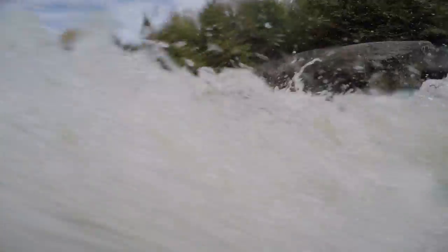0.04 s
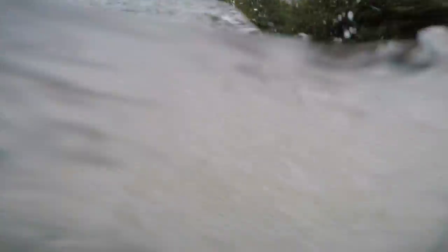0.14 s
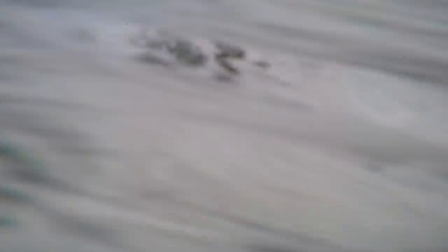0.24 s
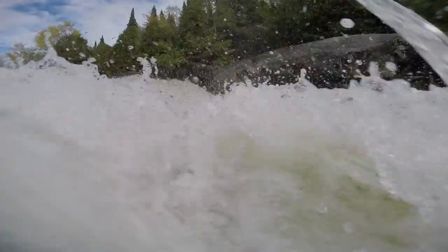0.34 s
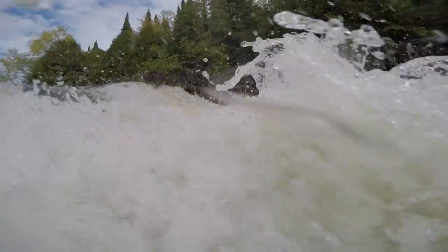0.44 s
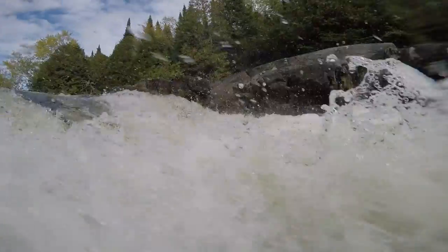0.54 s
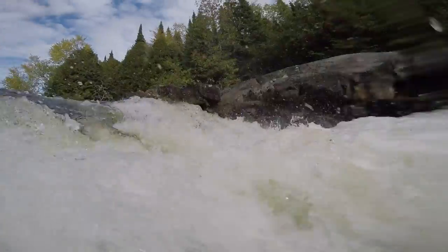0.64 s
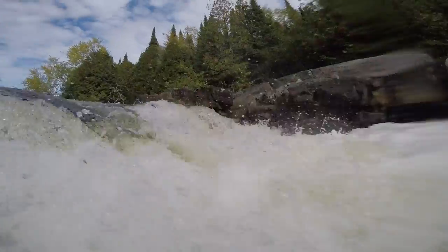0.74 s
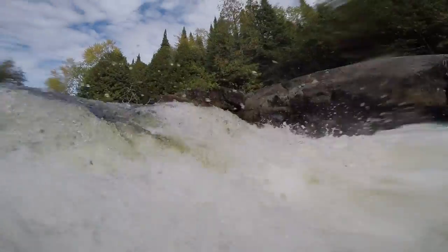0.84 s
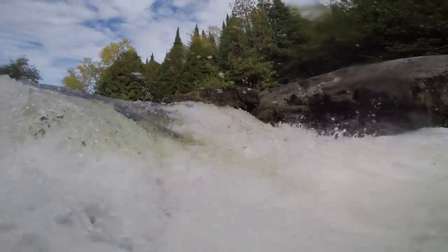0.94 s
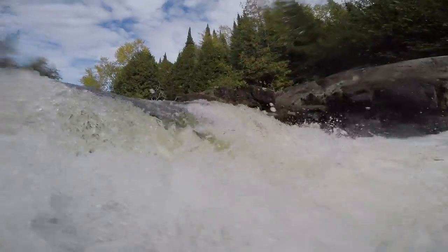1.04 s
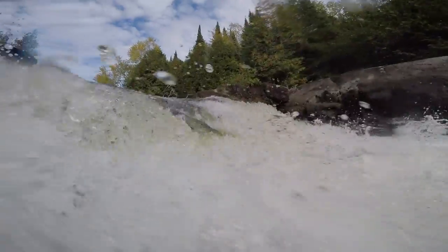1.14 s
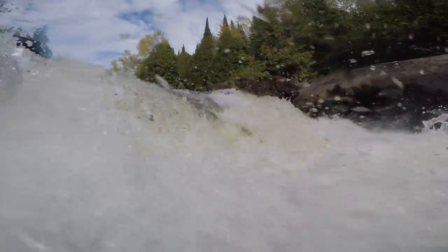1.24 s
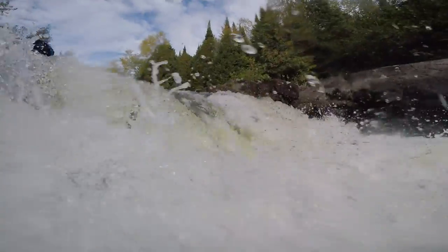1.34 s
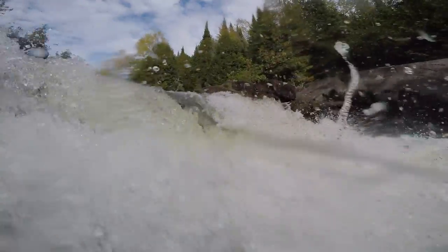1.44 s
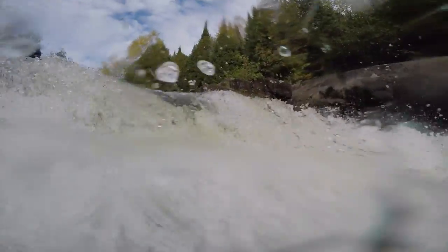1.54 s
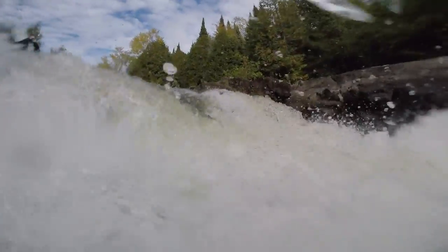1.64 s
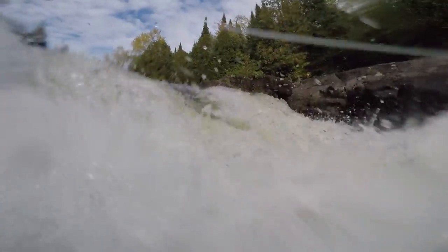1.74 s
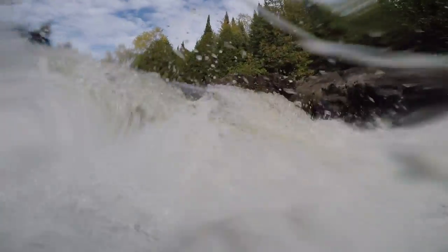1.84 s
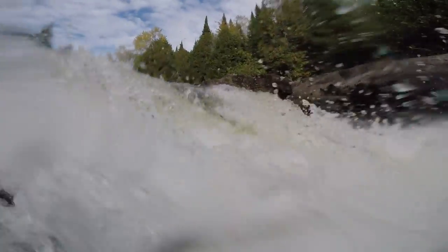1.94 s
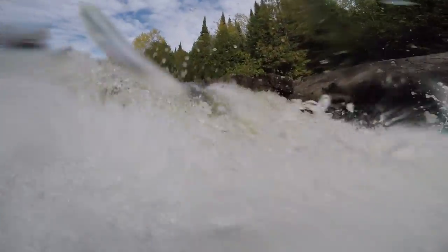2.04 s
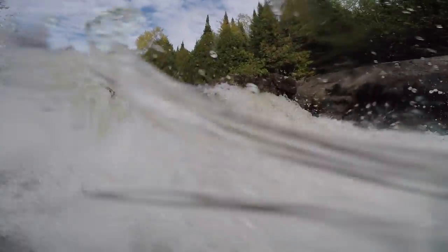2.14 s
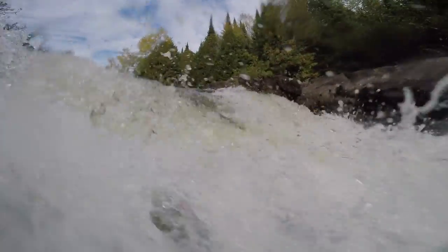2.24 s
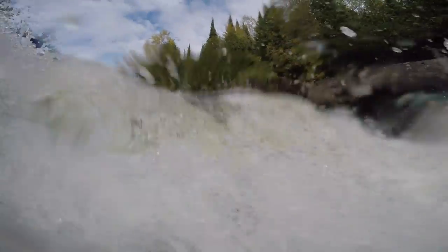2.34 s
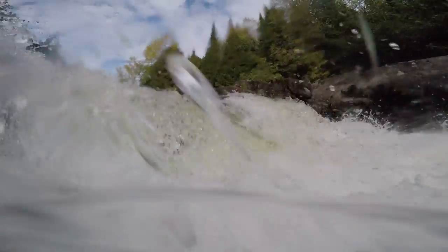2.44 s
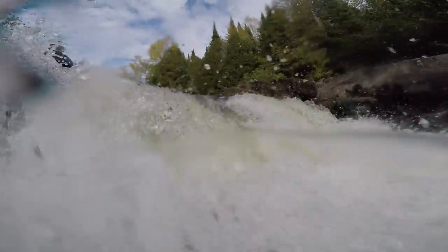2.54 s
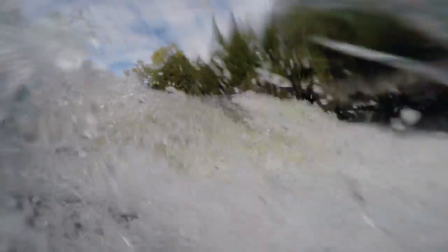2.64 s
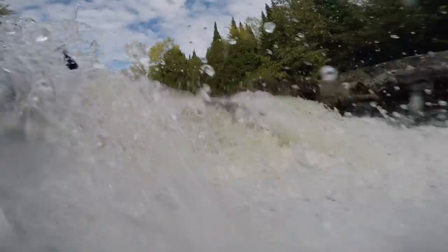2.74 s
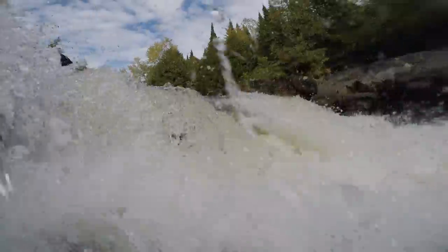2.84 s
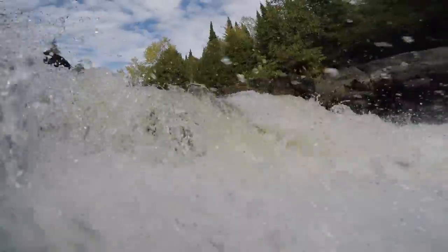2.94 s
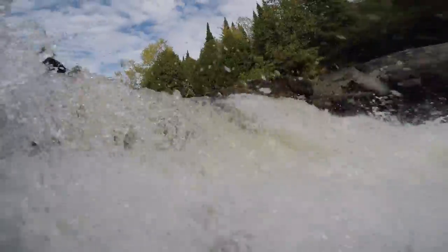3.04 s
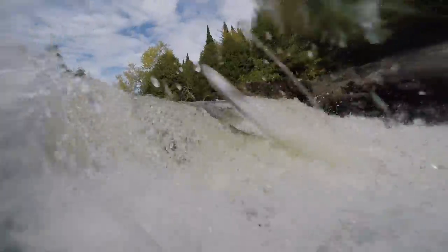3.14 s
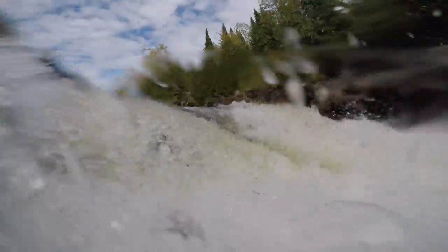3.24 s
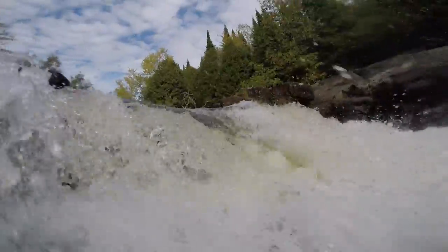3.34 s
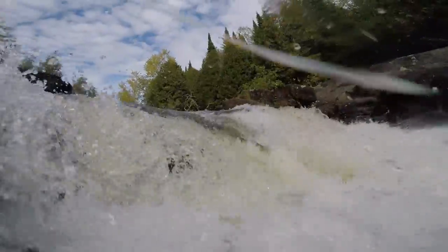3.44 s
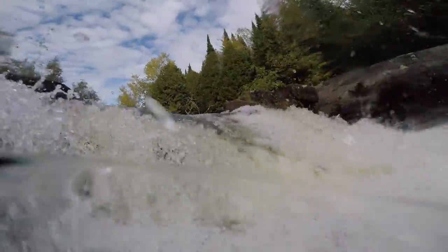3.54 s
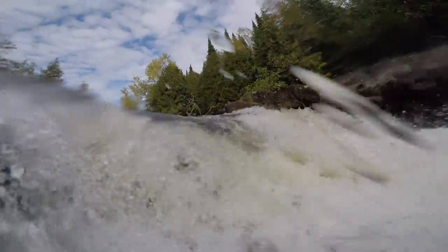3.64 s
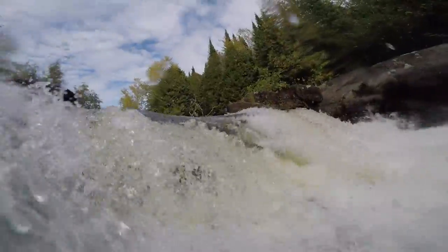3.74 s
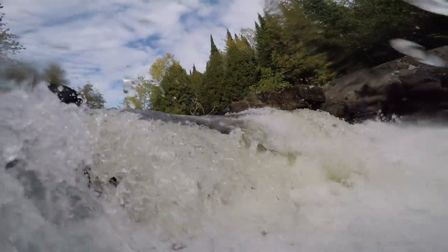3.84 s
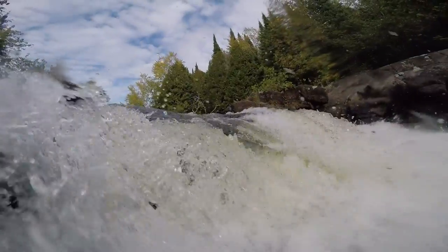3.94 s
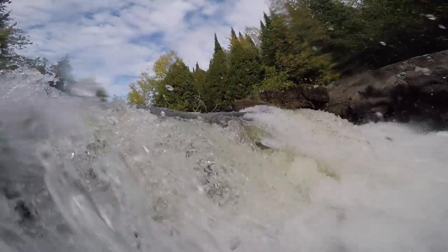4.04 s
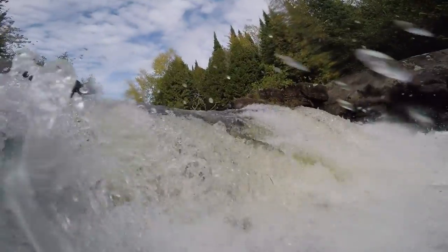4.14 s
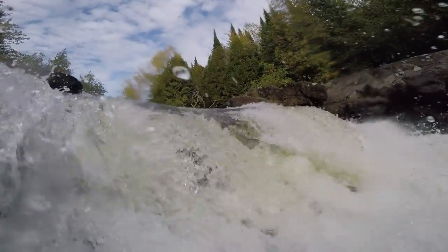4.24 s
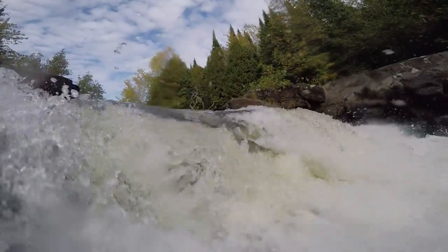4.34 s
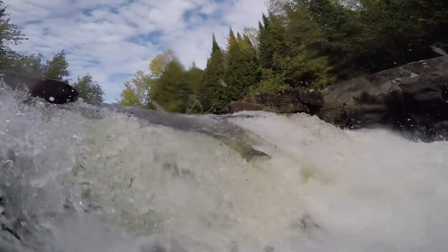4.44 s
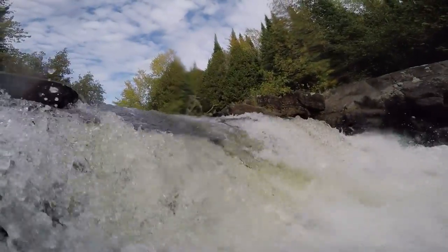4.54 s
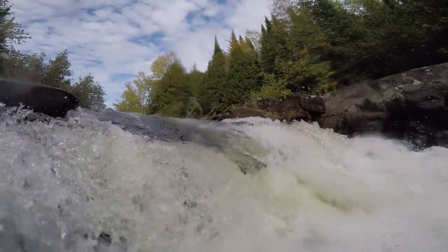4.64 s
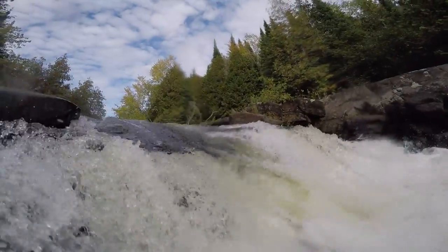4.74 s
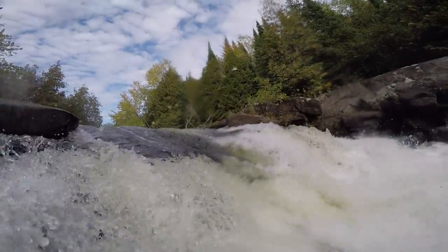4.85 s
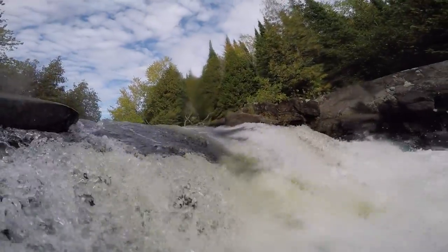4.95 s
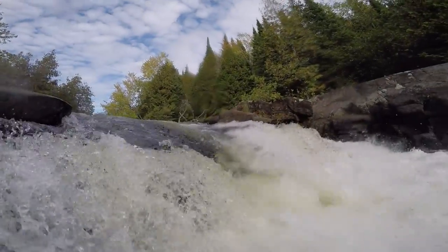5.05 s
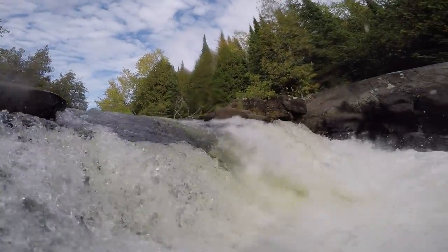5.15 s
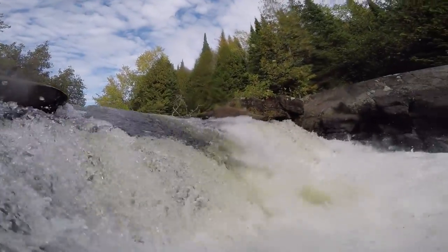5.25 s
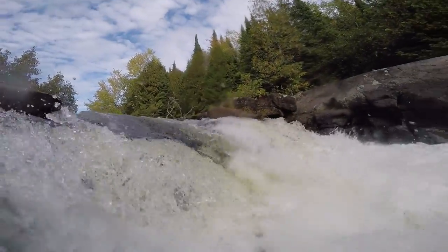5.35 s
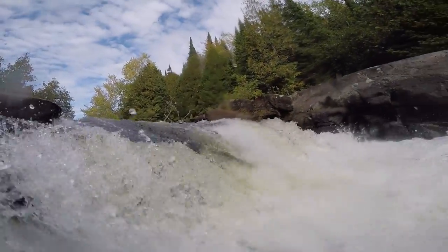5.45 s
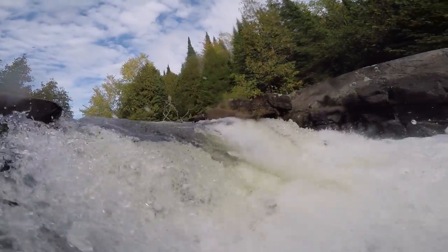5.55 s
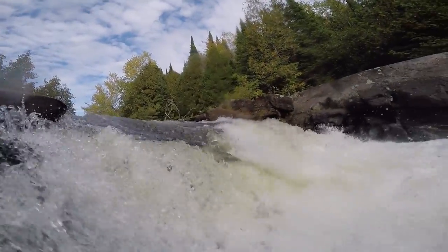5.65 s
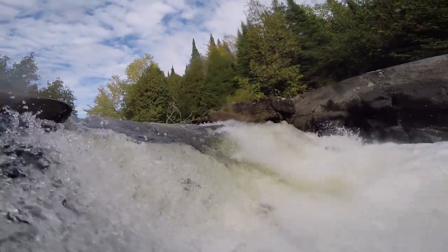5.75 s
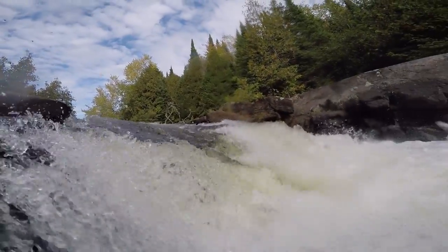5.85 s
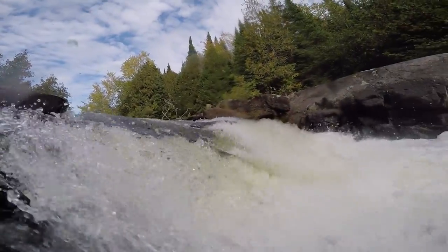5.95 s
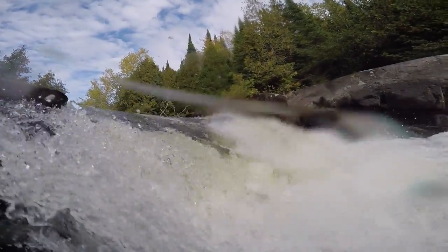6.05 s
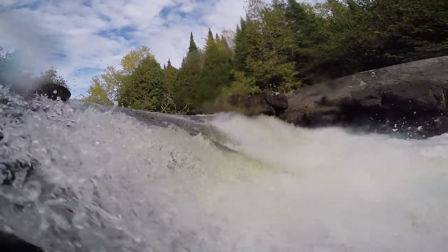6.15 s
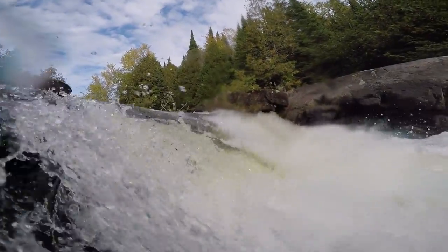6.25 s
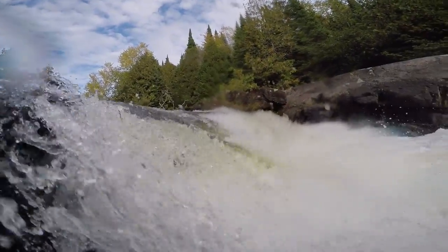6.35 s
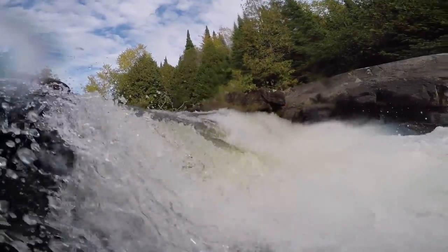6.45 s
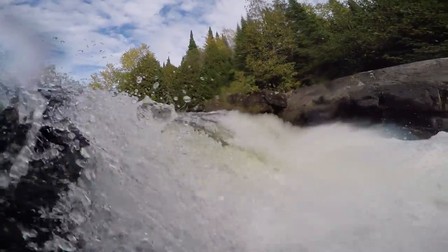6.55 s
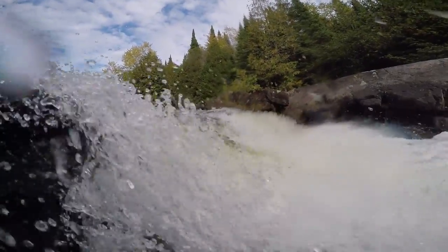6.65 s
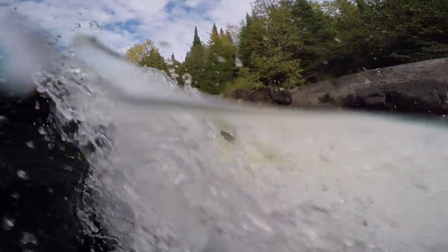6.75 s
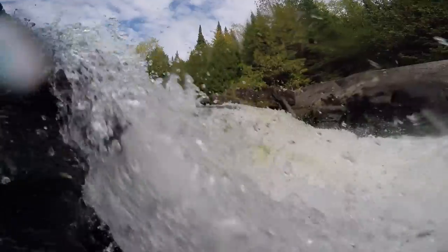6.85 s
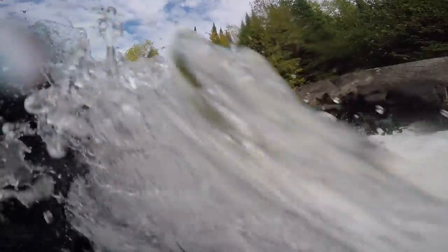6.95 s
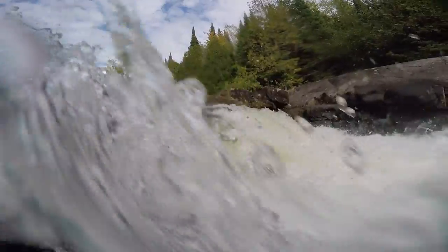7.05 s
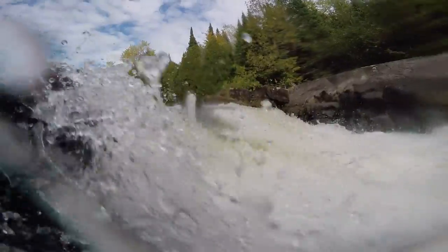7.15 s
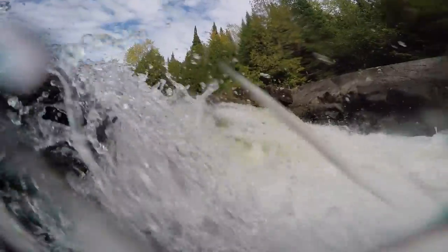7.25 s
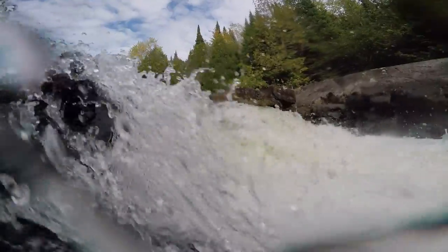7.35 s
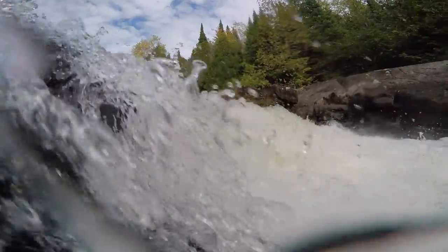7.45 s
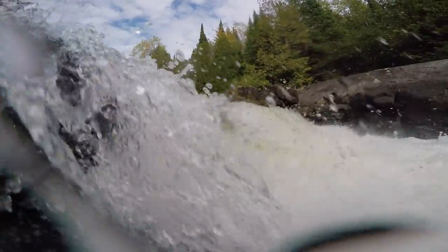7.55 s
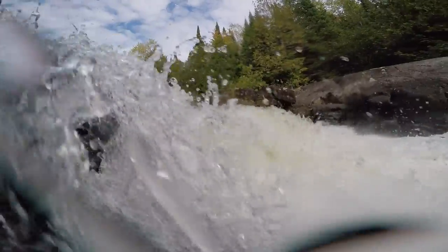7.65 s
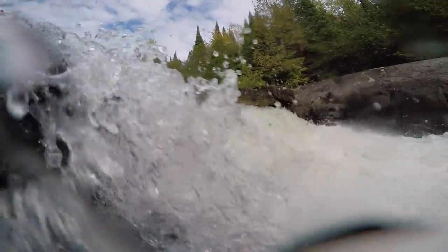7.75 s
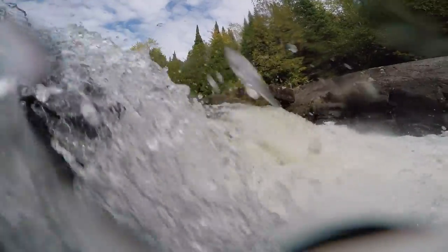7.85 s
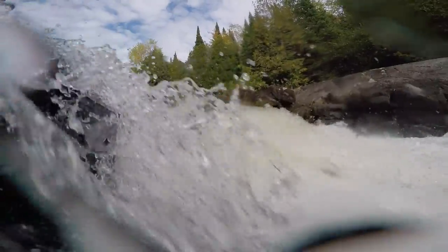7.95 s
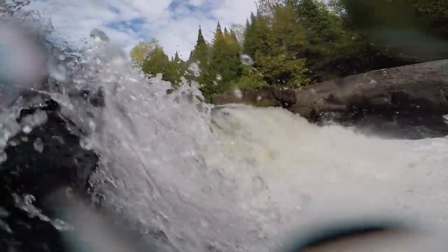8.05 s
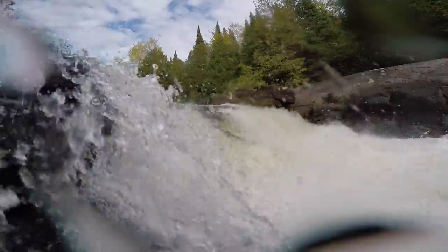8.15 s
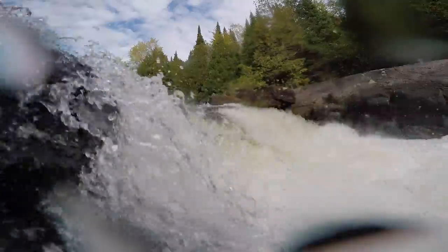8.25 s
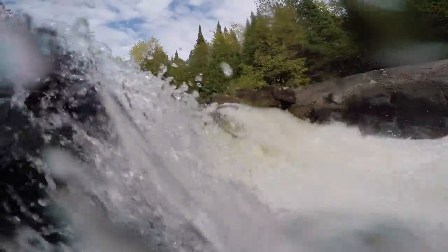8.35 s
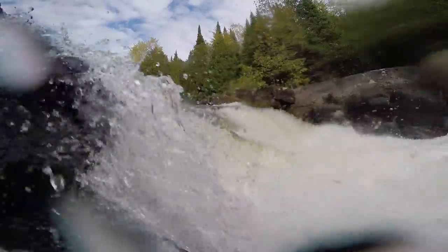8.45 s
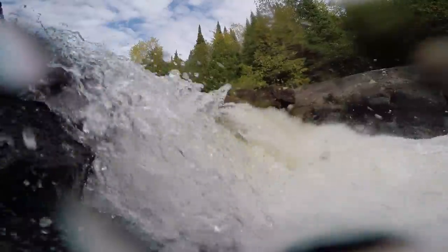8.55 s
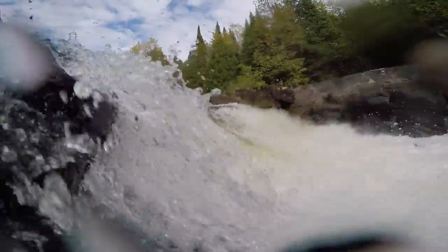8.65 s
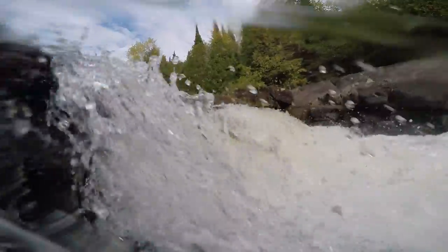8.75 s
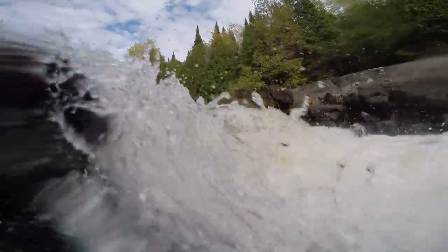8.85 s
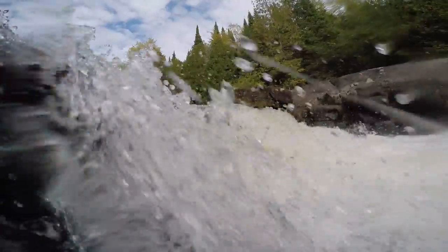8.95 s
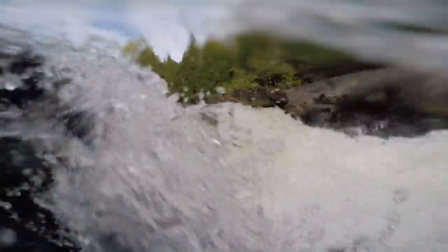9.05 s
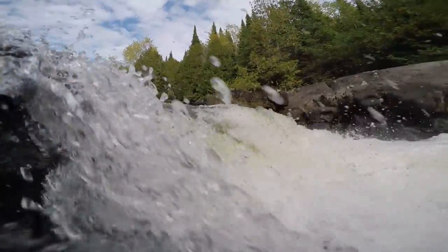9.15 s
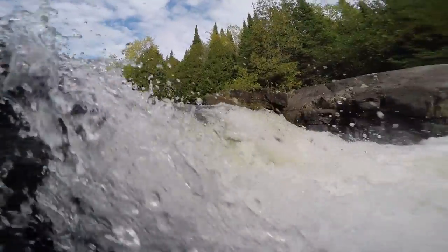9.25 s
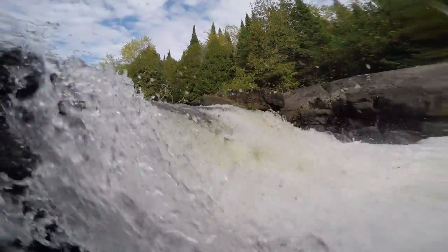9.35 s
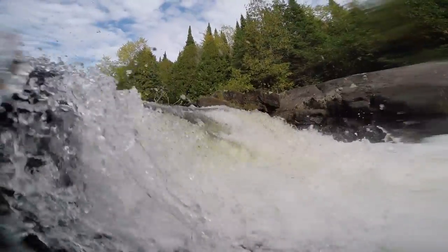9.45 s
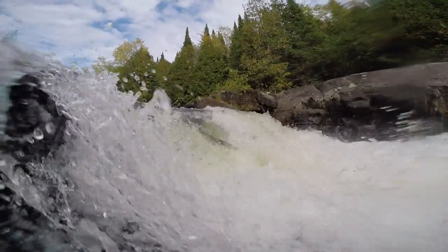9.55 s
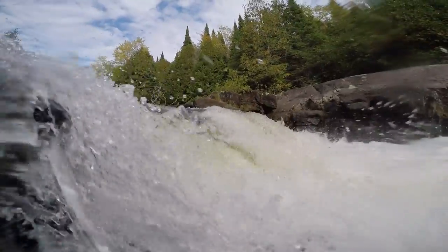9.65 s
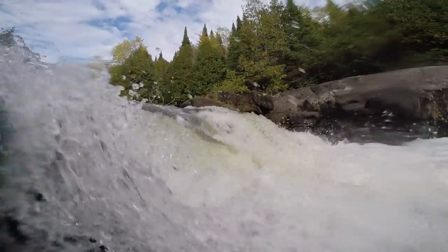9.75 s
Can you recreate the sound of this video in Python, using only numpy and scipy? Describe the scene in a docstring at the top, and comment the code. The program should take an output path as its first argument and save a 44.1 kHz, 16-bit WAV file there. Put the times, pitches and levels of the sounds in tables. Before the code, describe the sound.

A microphone sealed in a waterproof housing on a small boat sits at water level in a rapid. Bubbly whitewater roars throughout, with foam hiss above and a dull hull boom below. In the first half second spray patters and small gobs slap; it thins briefly, then at 1.3 s a wave smacks the housing with a deep gulp, slosh and boom, ducking the hiss. Drops and a sharp slap near 2.2 s lead into heavy spray sheets from 2.5 to 4.4 s, full of gurgles, plinking fat drops, slaps and hollow humming surges. From about 4.6 to 6.7 s it is mostly fuller, steadier roar with few drops. A hard plunge hits at 6.9 s, another with a sharp slap near 7.2 s, then sloshing and a big gulp at 7.7-7.9 s and smaller ones to 8.4 s. The hardest hits distort. The roar swells back, with a bright slap at 9.1 s and scattered drops.

```python
"""A microphone in a waterproof housing on a small boat, at water level in the middle of a rapid.
All through, bubble-filled noise roars around it and the hull booms on the current.
Early on drops patter and gobs slap the port; a wave gulps over it, then spray comes down in sheets
and the camera mount hums in surges. After a spell of mostly roar, more waves bury the port with slaps
and sloshes about them, the hardest hits overloading the input; scattered drops and slaps end it."""
import sys
import numpy as np
from scipy import signal
from scipy.fft import rfft, irfft, next_fast_len
from scipy.io import wavfile
from scipy.ndimage import uniform_filter1d, map_coordinates

SR = 44100
rng = np.random.default_rng(int(sys.argv[2]) if len(sys.argv) > 2 else 0)


def transcribe(signal):
    """Save signal, clipped to [-1, 1], as a 16-bit WAV file at the path in sys.argv[1]."""
    frames = np.atleast_2d(signal).T
    limited = np.clip(frames, -1, 1)
    pcm = np.round(limited * 32767).astype(np.int16)
    wavfile.write(sys.argv[1], SR, pcm)


N = 432180  # length in samples

# Resonances of the boat under the microphone: the hull's lowest mode and the camera mount
HULL_HZ, HULL_WIDTH_HZ = 45.5, 9
MOUNT_HZ, MOUNT_WIDTH_HZ = 241.6, 8.9


def from_db(db):
    """Decibels to gain."""
    return 10 ** (np.asarray(db) / 20)


def rms_one(x):
    """Scale to rms 1."""
    return x / np.sqrt(np.mean(x ** 2) + 1e-20)


def even(x, size):
    """Hold the rms at 1 over stretches of size samples, keeping the finer grain."""
    return x / np.sqrt(uniform_filter1d(x ** 2, size=size) + 1e-9)


def in_time(rows):
    """Each column of a curve, interpolated at every sample."""
    s, *columns = np.transpose(rows)
    return [np.interp(np.arange(N) / SR, s, column) for column in columns]


def drift(rate):
    """Smooth random curve of rms 1 that turns about rate times a second."""
    knots = rng.standard_normal(8000)
    return rms_one(map_coordinates(knots, [np.arange(N) / SR * rate], order=1, mode="wrap"))


def colour(x, spectrum):
    """Causal (minimum-phase) filter with the given spectrum; rms 1."""
    size = 2 * next_fast_len(N // 2 + 4096)
    hz, db = np.transpose(spectrum)
    grid = np.maximum(np.arange(size // 2 + 1) * SR / size, 1)
    curve_db = np.interp(np.log(grid), np.log(hz), db)
    cepstrum = irfft(np.log(from_db(curve_db)))
    # folding the cepstrum forward in time makes the filter causal
    cepstrum[1:size // 2] *= 2
    cepstrum[size // 2 + 1:] = 0
    response = np.exp(rfft(cepstrum))
    return rms_one(irfft(rfft(x, size) * response)[:N])


def ring(x, hz, width_hz):
    """A resonance: a unit click sets a sine of about height 1 ringing."""
    r, w = np.exp(-np.pi * width_hz / SR), 2 * np.pi * hz / SR
    return signal.lfilter([0, np.sin(w)], [1, -2 * r * np.cos(w), r * r], x + 1e-18)


def band(x, low_hz, high_hz):
    """Gentle band-pass."""
    edges_hz = [low_hz, min(high_hz, .45 * SR)]
    return signal.sosfilt(signal.butter(2, edges_hz, "band", fs=SR, output="sos"), x)


def add(out, s, sound):
    """Mix a sound in at time s."""
    at = max(round(s * SR), 0)
    out[at:at + len(sound)] += sound[:N - at]


def sinking_tone(t, hz, sink, settle_s):
    """An air pocket whose pitch falls by the share sink of hz, from above hz to below it."""
    pitch = hz * (1 + sink * (np.exp(-t / settle_s) - .5))
    return np.sin(2 * np.pi * np.cumsum(pitch) / SR)


def drops(per_s, spread_db, cycles):
    """Random drops of uneven size, each ringing a bubble; per_s and cycles are as for 2 kHz bubbles."""
    out = np.zeros(N)
    for hz in np.geomspace(520, 14000, 30):
        # small bubbles are the more common, and ring for more cycles
        smallness = np.sqrt(hz / 2000)
        born = np.flatnonzero(rng.random(N) < per_s / 30 * smallness / SR)
        sizes_db = spread_db * np.minimum(rng.exponential(1, len(born)), 3.5)
        clicks = np.zeros(N)
        clicks[born] = from_db(sizes_db) * rng.choice([-1, 1], len(born))
        bubbles = ring(ring(clicks, hz, hz / (cycles * smallness)), hz, hz / 2)
        out += np.sqrt(hz) * rms_one(bubbles)
    # bubbles glide in pitch as the water moves round them
    speed = 1 + .04 * drift(45)
    return rms_one(map_coordinates(out, [np.cumsum(speed)], order=1, mode="wrap"))


def impacts(per_s, spread_db, decay_s):
    """Envelope of random hits of uneven size, each sudden and dying quickly."""
    chance, sizes = rng.random(N), rng.standard_normal(N)
    hits = (chance < per_s / SR) * from_db(spread_db * np.clip(sizes, -2, 2))
    return signal.lfilter([1], [1, -np.exp(-1 / (decay_s * SR))], hits + 1e-18)


# The roar's rises and dips. Each row: time in seconds, level of the roar in dB.
RAPID_LEVEL = [(0, -36.5), (.6, -46), (1.15, -34.5), (1.55, -40), (1.9, -34.5), (2.4, -38), (4.35, -40.5),
               (4.7, -33), (5.2, -32), (6.1, -35), (6.85, -36.5), (7.25, -44), (7.65, -40.5), (8.3, -42),
               (8.7, -34.5), (9.8, -35.5)]
# Foam hiss against the roar. Each row: time in seconds, relative level in dB.
FOAM_SHARE = [(.2, -30), (.7, -6), (1.5, -12), (3.9, -7.5), (4.6, -4)]
# Spectrum of the roar. Each row: frequency in Hz, relative density in dB.
ROAR_SPECTRUM = [(100, -1), (350, 6), (550, -0.5), (800, 2.5), (1050, 1.5), (1200, 6.5), (1370, -6),
                 (1600, 4), (2100, 2.5), (2500, 3.5), (3200, -1.5), (3700, -10), (4500, -24)]
# Spectrum of the foam. Each row: frequency in Hz, relative density in dB.
FOAM_SPECTRUM = [(2800, -5), (3800, -9.5), (4300, 1.5), (5000, 3), (6300, 4), (7400, -5.5), (9800, -12.5),
                 (10800, -10), (15500, -17)]
ROAR_FLUTTER_DB = .9


def rapid(dip_gain):
    """All round the boat countless bubbles merge into a roar, with the hiss of bursting foam above it."""
    roar_db, = in_time(RAPID_LEVEL)
    share_db, = in_time(FOAM_SHARE)
    bubbles = rng.standard_normal(N) + 0.74 * drops(per_s=4000, spread_db=5.5, cycles=7.9)
    roar = from_db(ROAR_FLUTTER_DB * drift(25)) * colour(bubbles, ROAR_SPECTRUM)
    foam = from_db(share_db + drift(30)) * colour(rng.standard_normal(N), FOAM_SPECTRUM)
    return from_db(roar_db) * (roar + dip_gain * foam)


# Push of the current on the hull. Each row: time in seconds, level in dB.
CURRENT_LEVEL = [(0, -30), (.95, -58), (1.35, -38), (4.8, -44.5), (5.15, -36.5), (8.4, -34.5), (9.7, -37.5)]
# Spectrum of dull rumble and buffeting. Each row: frequency in Hz, relative density in dB.
BUFFET_SPECTRUM = [(20, -38), (55, -7.5), (90, 1.5), (170, -4), (330, -9.5), (400, -24.5), (900, -46)]
# how strongly and how slowly the weight of the spray rocks the hull
SPRAY_BOOM_DB, HULL_LAG_S = -7, 0.034


def boat(weight_gain, rumble_db=-8):
    """Current and weight of spray keep the hull booming at its lowest mode, over a dull rumble."""
    current_db, = in_time(CURRENT_LEVEL)
    keep = np.exp(-1 / (HULL_LAG_S * SR))
    spray_power = (from_db(SPRAY_BOOM_DB) * weight_gain) ** 2
    rocking_power = signal.lfilter([1 - keep], [1, -keep], spray_power)
    boom = ring(ring(rng.standard_normal(N), HULL_HZ, HULL_WIDTH_HZ), HULL_HZ, 2 * HULL_WIDTH_HZ)
    rumble = from_db(rumble_db) * colour(rng.standard_normal(N), BUFFET_SPECTRUM)
    return np.sqrt(from_db(current_db) ** 2 + rocking_power) * (even(boom, size=6000) + rumble)


# Surges that set the camera mount humming. Each row: start in seconds, level in dB.
SURGES = [(2.531, -26), (2.7, -18), (2.999, -16), (3.413, -22), (3.689, -18.5), (3.961, -19),
          (4.069, -19.5), (4.338, -27.5), (4.599, -30), (5.051, -28)]


def surges(rise_s=0.017, detune=0.024, roughness=0.17):
    """Each push of water swells the mount's hollow note, roughly and a little off pitch with its load."""
    out, t = np.zeros(N), np.arange(12000) / SR
    swell = (t / rise_s) * np.exp(1 - t / rise_s)
    for (s, db), load in zip(SURGES, rng.standard_normal(len(SURGES))):
        note = np.sin(2 * np.pi * MOUNT_HZ * (1 + detune * load) * t)
        add(out, s, from_db(db) * swell * note)
    return out * (1 + roughness * drift(110))


# Sheets of spray landing on the housing. Each row: start in seconds, relative level in dB,
# hold in seconds, weight in dB (heavy water above 0, fine spray below).
SHOWERS = [(.028, -31, 0.13, -2), (0.117, -24.5, 0.078, -3.5), (.19, -23, 0.026, 1.5),
           (0.236, -24, 0.064, -5.5), (0.369, -29.5, 0.034, -6), (0.441, -34.5, 0.028, 9),
           (1.16, -28.5, 0.092, 1), (1.488, -33.5, 0.052, -2), (1.675, -31, 0.04, 2),
           (1.8, -34.5, 0.15, 0.5), (1.935, -29, 0.068, -2), (2.11, -34, 0.12, 3.5),
           (2.506, -38.5, 0.069, 9.5), (2.626, -20.5, 0.075, -5.5), (2.719, -32.5, 0.22, 14),
           (2.969, -31.5, 0.066, 9), (3.105, -30.5, 0.017, 9), (3.148, -25, 0.016, 4),
           (3.202, -32.5, 0.061, 7.5), (3.36, -30, 0.0063, 9.5), (3.468, -33.5, 0.065, 7),
           (3.563, -31.5, 0.06, 9.5), (3.768, -33, 0.35, 5.5), (3.922, -28, 0.049, 8.5),
           (4.029, -29.5, 0.11, 8), (4.15, -27.5, 0.12, 5.5), (4.234, -23.5, 0.023, -3),
           (4.324, -35, 0.086, 9.5), (8.045, -30.5, 0.013, -4)]
SHOWER_ATTACK_S, SHOWER_RELEASE_S = 0.0025, 0.019
RUNOFF_DB, RUNOFF_S = -9, 0.13  # water running off after each sheet, against its release
STRAY_DROPS_DB = -47.5  # drops that keep landing between the sheets


def showers():
    """Each sheet swells, holds, dies and runs off: the gains of its drops, its mist and its weight."""
    power, t = np.zeros((3, N)), np.arange(SR) / SR
    for s, db, hold_s, weight_db in SHOWERS:
        after = np.maximum(t - hold_s, 0)
        runoff = from_db(RUNOFF_DB) * np.exp(-after / RUNOFF_S)
        fall = np.exp(-after / SHOWER_RELEASE_S) + runoff
        shape = np.minimum(t / SHOWER_ATTACK_S, 1) * fall / (1 + from_db(RUNOFF_DB))
        # heavy water thuds, fine spray hisses
        for part, part_db in zip(power, (db, db - weight_db, db + weight_db)):
            add(part, s, (from_db(part_db) * shape) ** 2)
    return np.sqrt(power + from_db(STRAY_DROPS_DB) ** 2)


# Spectrum of drops pattering on the housing. Each row: frequency in Hz, relative density in dB.
PATTER_SPECTRUM = [(450, -16.5), (600, -8.5), (750, 1), (980, -6), (1200, 0.5), (1500, -2), (2050, 2),
                   (3300, -4), (4200, -6.5), (5500, -5), (7000, -13), (10000, -54)]
# Spectrum of the hiss of fine spray. Each row: frequency in Hz, relative density in dB.
MIST_SPECTRUM = [(900, 0), (2400, -17), (4500, 8), (7500, -4), (15500, -9.5)]


def spray(drop_gain, mist_gain, weight_gain, patter_db=4.5, gurgle_db=6.0, tick_db=-7,
          buffet_db=-6, hum_db=-6.0, mist_db=-10, split_hz=1350):
    """Drops clump on the housing round the microphone; heavy water gurgles, buffets and stirs the mount."""
    clumps = from_db(4 * drift(80) + 2.8 * drift(280))
    # only the larger drops trap a bubble; the fine ones just tick
    plops = rms_one(band(drops(per_s=3400, spread_db=4.1, cycles=17), 300, 4600))
    ticks = rms_one(rng.standard_normal(N) * (rng.random(N) < 7000 / SR))
    landing = clumps * (plops + from_db(tick_db) * ticks)
    both = even(colour(landing, PATTER_SPECTRUM), size=1800)
    # below the split the drops gurgle, above it they patter
    gurgle = signal.sosfiltfilt(signal.butter(2, split_hz, fs=SR, output="sos"), both)
    patter = both - gurgle
    drumming = from_db(patter_db) * drop_gain * patter
    drumming += from_db(gurgle_db) * np.sqrt(drop_gain * weight_gain) * gurgle
    buffet = even(colour(clumps * rng.standard_normal(N), BUFFET_SPECTRUM), size=5000)
    hum = even(ring(rng.standard_normal(N), MOUNT_HZ, MOUNT_WIDTH_HZ), size=5000)
    heavy = weight_gain * (from_db(buffet_db) * buffet + from_db(hum_db) * hum)
    mist = even(colour(clumps * ticks, MIST_SPECTRUM), size=1800)
    return drumming + from_db(mist_db) * mist_gain * mist + heavy


# Fine drops straight on the port. Each row: start in seconds, relative level in dB.
FLECKS = [(.150, -8), (0.44, -16), (1.773, -8), (2.126, -6), (3.881, -10.5), (3.977, -9), (4.204, -20),
          (7.126, -3), (8.049, -5)]
# Spectrum of a fine drop's crack. Each row: frequency in Hz, relative density in dB.
FLECK_SPECTRUM = [(2600, -4), (7000, -2), (15500, -6)]


def flecks(drop_gain, stray_db=-3, fleck_s=0.00084):
    """Fine drops hit the port with a small bright crack; random ones are thrown wide of each sheet."""
    t = np.arange(512) / SR
    nearby = uniform_filter1d(drop_gain, size=9000)
    bursts = from_db(stray_db) * nearby * impacts(per_s=20, spread_db=1.5, decay_s=fleck_s)
    for s, db in FLECKS:
        add(bursts, s, from_db(db) / 2 * np.exp(-t / fleck_s))
    return bursts * colour(rng.standard_normal(N), FLECK_SPECTRUM)


# Single fat drops on the housing. Each row: start in seconds, level in dB, middle pitch of the bubble in Hz.
FAT_DROPS = [(.356, -5, 3800), (.377, -7.5, 1940), (.610, -13.5, 4970), (.728, -15, 1300), (.736, -8, 3300),
             (1.134, -13.5, 1140), (1.197, -5, 1790), (1.552, -14, 2030), (1.611, -7.5, 2460),
             (1.942, -3.5, 2030), (2.286, -4.5, 2850), (2.316, -15.5, 1700), (2.335, -11, 3060),
             (2.565, -7, 2500), (2.657, -8, 1210), (2.713, -1, 2860), (2.892, 2.5, 2700), (3.149, -13, 820),
             (3.161, -3, 3130), (3.238, 4.5, 3400), (3.267, -7.5, 930), (3.329, -8, 3220),
             (3.603, -1, 1950), (3.697, 1, 1920), (3.770, -9.5, 1250), (3.806, -5, 3040), (3.850, -9, 2000),
             (3.934, -11, 884), (4.050, -15, 1150), (4.105, 0.5, 1670), (4.116, 1.5, 5300),
             (4.153, -8, 2070), (4.216, -7.5, 4140), (4.319, 3.5, 1810), (4.328, -6, 2100),
             (4.384, -6, 1950), (4.455, -7, 1880), (4.624, -15.5, 1460), (5.057, -17.5, 910),
             (5.930, -10.5, 2500), (6.369, -7.5, 2600), (6.667, -7, 1850), (8.549, -10.5, 1140),
             (8.797, -10.5, 2000), (9.261, -6.5, 6100), (9.416, -11, 2820)]


def fat_drops(cycles=2.12, sink=0.24, crack_db=-13, crack_s=0.001):
    """A fat drop cracks on the housing and its bubble rings for a few cycles, falling in pitch."""
    out, t = np.zeros(N), np.arange(1024) / SR
    for s, db, hz in FAT_DROPS:
        ring_s = cycles / hz
        ping = np.exp(-t / ring_s) * sinking_tone(t, hz, sink, ring_s)
        crack = np.exp(-t / crack_s) * rms_one(band(rng.standard_normal(len(t)), hz / 2, 2.58 * hz))
        add(out, s, from_db(db) * (ping + from_db(crack_db) * crack))
    return out


# Water sloshing against the housing. Each row: start in seconds, churn level in dB, length in seconds,
# upper edge of the churn in Hz, bubble level in dB.
SLOSHES = [(1.284, -23, 0.055, 320, -30), (5.567, -29.5, 0.065, 106, -41), (6.862, -9, 0.031, 370, -42),
           (7.684, -24.5, 0.045, 163, -46), (7.738, -15.5, 0.029, 416, -28),
           (7.776, -21, 0.065, 330, -34.5), (7.861, -21, 0.024, 150, -29.5),
           (8.094, -20.5, 0.043, 302, -28.5), (8.154, -32, 0.022, 258, -30), (9.202, -26.5, 0.21, 115, -44)]


def sloshes(froth_length=1.0):
    """Solid water shoves the housing: a low churn, with a froth of muffled bubbles in it."""
    out, froth, t = np.zeros(N), np.zeros(N), np.arange(24000) / SR
    onset = 1 - np.exp(-t / 0.00092)
    for s, db, length_s, top_hz, bubbles_db in SLOSHES:
        churn = rng.standard_normal(len(t))
        for _ in range(3):  # three passes steepen the band's edges
            churn = band(churn, 55, top_hz)
        add(out, s, from_db(db) * onset * np.exp(-(t / length_s) ** 2) * even(churn, size=1500))
        add(froth, s, from_db(bubbles_db) * onset * np.exp(-(t / (froth_length * length_s)) ** 2))
    bubbles = drops(per_s=5700, spread_db=4.5, cycles=14)
    muffled = even(band(band(bubbles, 510, 2100), 510, 2100), size=1500)
    return out + froth * muffled


# Gobs of water on the port. Each row: start in seconds, level in dB, middle pitch of the trapped air in Hz,
# length of the splat in seconds.
SLAPS = [(0.055, -9, 1860, 0.0043), (0.120, -4, 1970, 0.0026), (.191, -10, 2900, 0.026),
         (.237, -8.5, 2300, 0.0067), (.273, -8, 2720, 0.013), (0.441, -8, 1750, 0.0056),
         (0.697, -11, 1780, 0.0037), (1.23, 3, 2160, 0.0052), (1.239, -3.5, 2150, 0.0052),
         (2.127, -8, 1670, 0.0045), (2.184, 2.5, 4560, 0.0034), (2.271, -7.5, 1429, 0.0044),
         (2.387, -14, 3400, 0.016), (2.510, -1.5, 2210, 0.0055), (2.78, -2, 2020, 0.0041),
         (2.836, 1, 2480, 0.0048), (2.851, -6, 2600, 0.011), (2.972, -6, 1517, 0.0045),
         (3.207, -9, 2400, 0.005), (3.254, -10, 2900, 0.014), (3.625, -1.5, 2370, 0.0043),
         (3.966, -7, 2050, 0.0037), (4.26, -6.5, 2950, 0.0037), (6.804, -7, 1800, 0.0047),
         (6.873, -5.5, 2280, 0.0041), (7.116, 5.5, 1640, 0.0029), (7.164, -15, 4500, 0.005),
         (7.857, -10.5, 3720, 0.0037), (8.043, -11, 1630, 0.0031), (8.064, 0.5, 2640, 0.0042),
         (9.015, -9, 4040, 0.0048), (9.086, -11.5, 2540, 0.0067), (9.1, 3.5, 2960, 0.0042)]


def slaps(sink=0.14, settle_s=0.004, crack_db=-13, wash_db=-26, wash_s=0.013, thud_db=-28,
          rise_s=0.00028):
    """A gob traps air on the port: a short sinking ping, a crackling splat and a wash of droplets."""
    out, t = np.zeros(N), np.arange(4096) / SR
    for s, db, hz, length_s in SLAPS:
        crack, wash, flutter = rng.standard_normal((3, len(t)))
        splat = (1 - np.exp(-(t / rise_s) ** 2)) * np.exp(-(t / length_s) ** 2)
        # the longer the splat, the more its ping breaks up into noise
        broken = np.clip(length_s / 0.0065, 0, 1)
        ping = (1 - broken) * sinking_tone(t, hz, sink, settle_s)
        ping += broken / 2 * even(band(flutter, 0.48 * hz, 1.48 * hz), size=128)
        # small pockets crack more loudly
        cracks = from_db(crack_db) * np.sqrt(hz / 2500) * rms_one(band(crack, 740, 8000))
        sound = splat * (np.sqrt(2) * ping + cracks)
        sound += from_db(wash_db) * np.exp(-t / wash_s) * rms_one(band(wash, 1230, 4200))
        # the camera mount answers with a faint thud
        sound += from_db(thud_db) * np.exp(-t / 0.022) * np.sin(2 * np.pi * MOUNT_HZ * t)
        add(out, s, from_db(db) * sound)
    return out


# Waves closing over the port. Each row: start in seconds, smack level in dB, middle pitch of the smack in Hz,
# gulp level in dB, middle pitch of the gulp in Hz, hull boom level in dB.
PLUNGES = [(1.280, 2.5, 1430, 11, 212, -8), (6.862, 3.5, 1044, 5.5, 233.5, -7),
           (7.226, -3.5, 1233, -4, 263, -15), (7.821, 3.5, 1243, 7, 142, -9.5),
           (8.092, -7, 1340, -15.5, 196, -20), (8.360, -10.5, 1220, -16.5, 239, -26.5)]


def plunges(smack_s=0.0038, gulp_s=0.0077, boom_s=0.044, shove_db=8, shove_hz=72, shove_s=0.014,
            gargle_db=-5, gargle_s=0.0035, wash_db=-27, wash_s=0.01, mount_db=-21, mount_s=0.0275):
    """A wave smacks the port shut; trapped air gulps down in pitch, the mount rings and the hull booms."""
    out, t = np.zeros(N), np.arange(20000) / SR
    swell = 1 - np.exp(-(t / 0.0016) ** 2)
    for s, smack_db, smack_hz, gulp_db, gulp_hz, boom_db in PLUNGES:
        bright, dull = rng.standard_normal((2, len(t)))
        splat = even(band(band(bright, 800, 2400), 800, 2400), size=200)
        gargle = even(band(band(dull, 400, 1050), 400, 1050), size=300)
        smack_tone = sinking_tone(t, smack_hz, sink=0.15, settle_s=0.0037)
        smack = np.exp(-t / smack_s) * (smack_tone + 0.22 * splat)
        smack += from_db(gargle_db) * np.exp(-t / gargle_s) * gargle
        smack += from_db(wash_db) * np.exp(-t / wash_s) * splat
        gulp = np.exp(-t / gulp_s) * sinking_tone(t, gulp_hz, sink=0.3, settle_s=0.006)
        gulp += from_db(mount_db) * np.exp(-t / mount_s) * np.sin(2 * np.pi * MOUNT_HZ * t)
        boom = np.exp(-t / boom_s) * np.sin(2 * np.pi * HULL_HZ * t)
        # the wave also shoves the housing
        boom += from_db(shove_db) * np.exp(-t / shove_s) * np.sin(2 * np.pi * shove_hz * t)
        low = swell * (from_db(gulp_db) * gulp + from_db(boom_db) * boom)
        add(out, s, from_db(smack_db) * smack + low)
    return out


# depth of the dip after a gulp at full scale, and its recovery time constant
DIP_DB, RECOVERY_S = -5.5, 0.17


def dips_after_plunges():
    """The level of foam hiss and spray ducks at each plunge and recovers: the gain left for them."""
    depth, t = np.zeros(N), np.arange(SR) / SR
    for s, _, _, gulp_db, _, _ in PLUNGES:
        add(depth, s, min(from_db(gulp_db), 1) * np.exp(-t / RECOVERY_S))
    return from_db(DIP_DB * depth)


def scene():
    """Everything reaches the one microphone at close range."""
    drop_gain, mist_gain, weight_gain = showers()
    dip_gain = dips_after_plunges()
    background = rapid(dip_gain) + boat(weight_gain)
    ducked_spray = dip_gain * spray(drop_gain, mist_gain, weight_gain)
    drops_on_housing = ducked_spray + flecks(drop_gain) + fat_drops()
    solid_water = surges() + sloshes() + slaps() + plunges()
    return (background + drops_on_housing + solid_water)[None]


CUTOFF_HZ = 15500


def record(dry, low_cut_hz=33):
    """The microphone sheds the deepest rumble, the hardest hits overload the input; the top is cut."""
    lean = signal.sosfilt(signal.butter(2, low_cut_hz, "high", fs=SR, output="sos"), dry)
    # peaks bend smoothly towards a ceiling of .93
    rounded = lean / (1 + (lean / .93) ** 6) ** (1 / 6)
    return signal.sosfilt(signal.ellip(10, .1, 70, CUTOFF_HZ, fs=SR, output="sos"), rounded)


dry = scene()
out = record(dry)
transcribe(out)
```